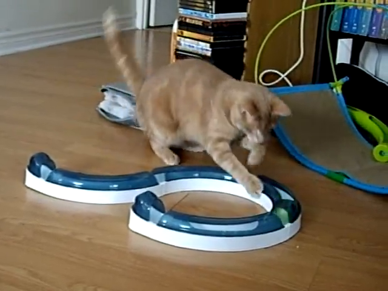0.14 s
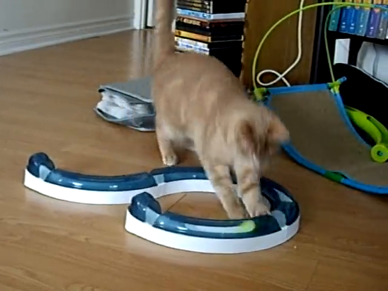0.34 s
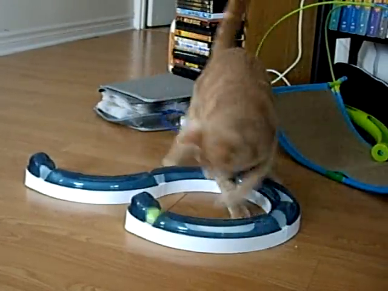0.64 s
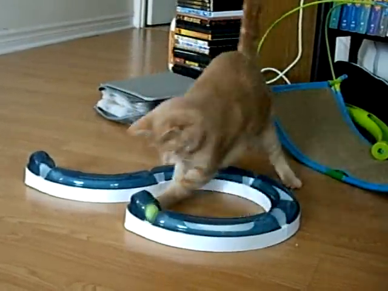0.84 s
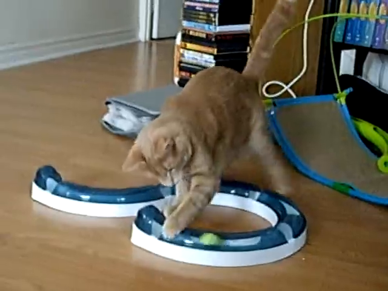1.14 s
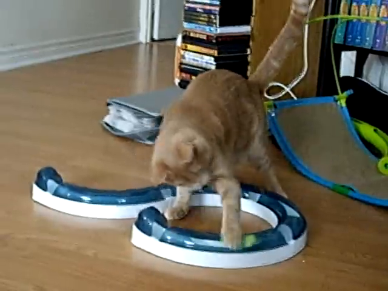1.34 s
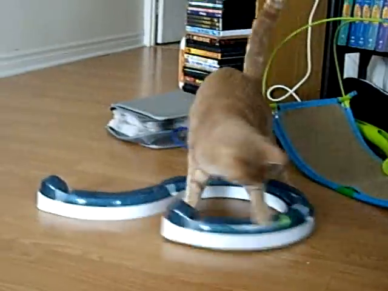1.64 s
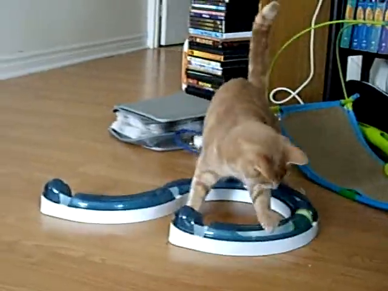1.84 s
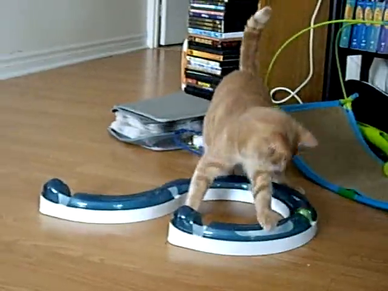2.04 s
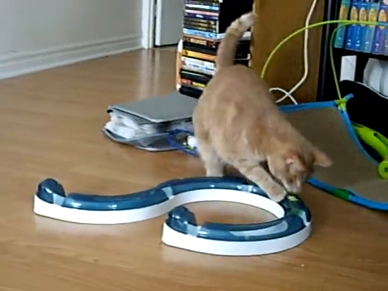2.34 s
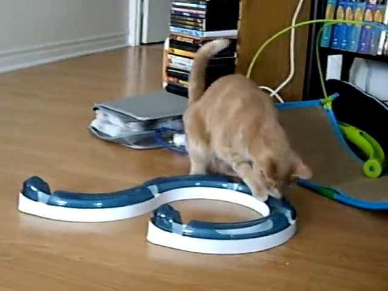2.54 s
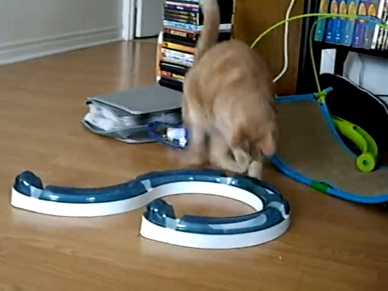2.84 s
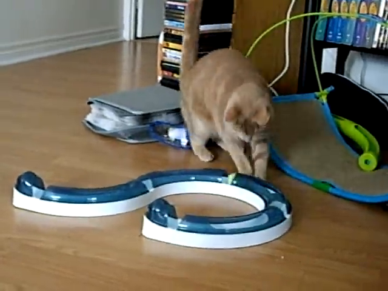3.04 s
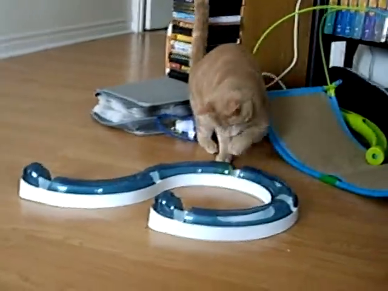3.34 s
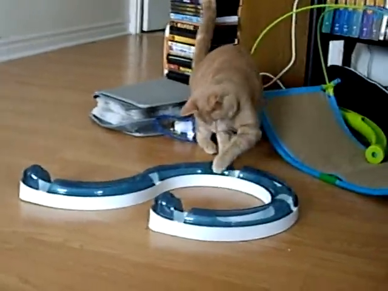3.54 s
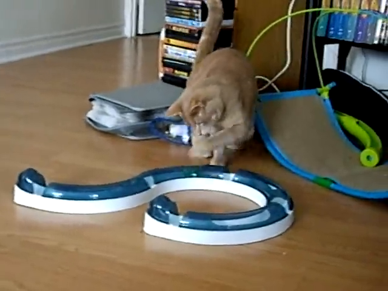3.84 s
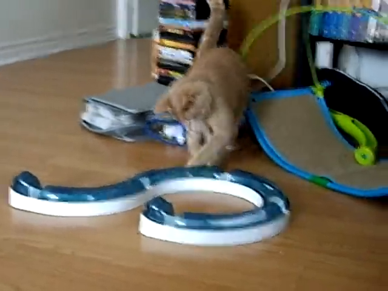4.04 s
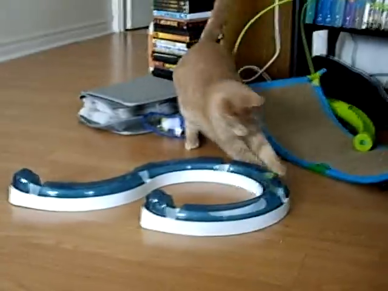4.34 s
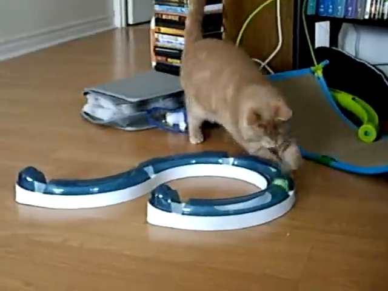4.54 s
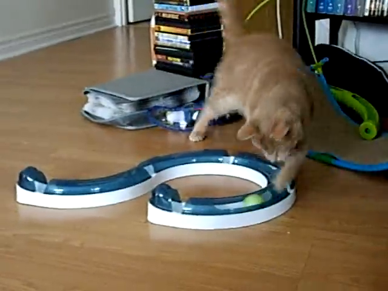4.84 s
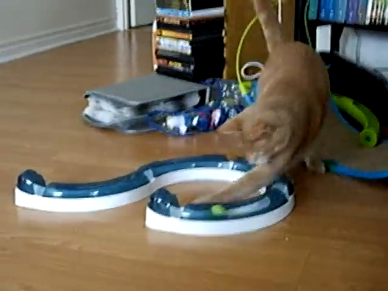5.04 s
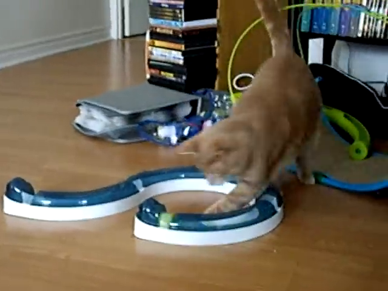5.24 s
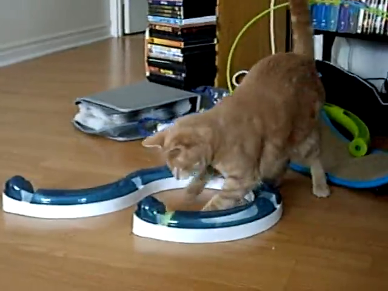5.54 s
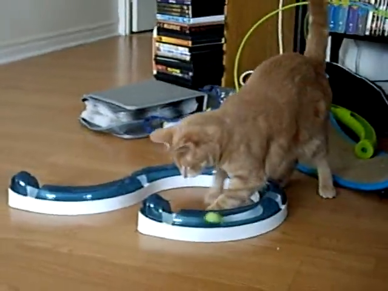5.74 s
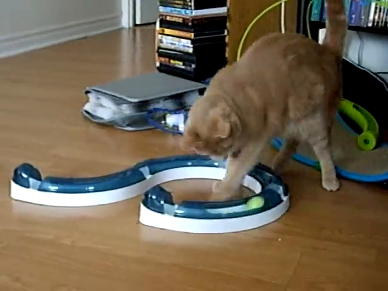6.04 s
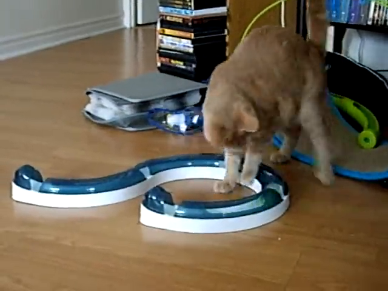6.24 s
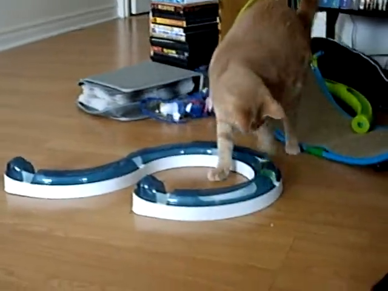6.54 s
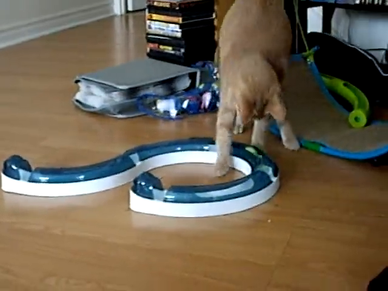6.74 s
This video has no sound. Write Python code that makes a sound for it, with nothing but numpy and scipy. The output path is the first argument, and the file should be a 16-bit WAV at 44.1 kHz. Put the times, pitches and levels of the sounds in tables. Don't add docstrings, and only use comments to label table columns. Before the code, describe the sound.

Irregular hollow plastic knocks and a rolling, clattering ball as a cat bats a toy indoors, above steady low hum and faint hiss.

```python
import sys
import numpy as np
from scipy import signal
from scipy.fft import rfft, irfft, next_fast_len
from scipy.io import wavfile
from scipy.ndimage import uniform_filter1d

SR = 44100
rng = np.random.default_rng(int(sys.argv[2]) if len(sys.argv) > 2 else 0)


def file_out(sig):
    cols = np.atleast_2d(sig).T
    lim = np.clip(cols, -1, 1)
    pcm = np.round(lim * 32767).astype(np.int16)
    wavfile.write(sys.argv[1], SR, pcm)


def makeup_ratio(level_db):
    decades = np.asarray(level_db, float) / 20
    return 10 ** decades


N = 304334

# (time [s], body peak [dB], body pitch [Hz], crack over body [dB], rattle fall by 60 dB [s])
BLOWS = [(1.3241, -15, 1480, -2.5, 0.028), (1.326, -22.5, 393, -26, 0.019), (1.461, -23, 1250, -45, 0.035),
         (1.466, -21.5, 1070, -28, 0.013), (1.4778, -10.5, 1076, 1, 0.03), (1.4779, -4.5, 7200, -6, .004),
         (1.479, -10.5, 1630, -11.5, 0.036), (2.023, -32, 376, -30, 0.014),
         (3.3252, -13, 1630, -12.5, 0.0021), (3.327, -10, 845, -36, 0.0063), (3.516, -18, 820, -8, 0.0048),
         (3.5291, -15, 1400, 5.5, 0.0089), (3.5301, -7, 820, -10, 0.014), (3.5289, -4, 6600, -9, .004),
         (3.867, -34, 398, -34, 0.013), (4.319, -30.5, 1210, 9, 0.012), (4.3245, -15, 1000, -0.5, 0.0097),
         (4.3255, -17.5, 566, -24, 0.071), (4.4475, -21.5, 870, -18, .015), (4.453, -29.5, 383, -23, 0.014),
         (4.083, -36, 480, -25, 0.027), (3.334, -22, 368, -30, 0.018), (3.324, -16, 640, -27, .006)]
# (time [s], body peak [dB], body pitch [Hz], crack over body [dB])
KNOCKS = [(0.053, -32.5, 700, -18), (0.134, -32.5, 1140, -20), (0.262, -33.5, 720, -24),
          (0.302, -37, 480, -23), (0.415, -30, 1400, -3), (0.444, -20, 710, -23), (0.467, -24, 584, -13),
          (0.494, -33, 1180, -13), (0.564, -37, 1120, -20), (0.784, -28.5, 1030, -11),
          (0.793, -26.5, 1090, -35), (0.865, -26.5, 1110, 0.5), (0.88, -22, 1600, -1), (0.9, -28, 895, -18),
          (1.175, -35, 1130, 0), (1.227, -33.5, 1300, -25), (1.683, -28.5, 970, -9),
          (1.73, -27.5, 1220, -25), (2.24, -32, 1075, -44), (4.055, -22, 1030, -11),
          (4.139, -29.5, 1030, 1), (4.256, -27, 1130, -8.5), (4.374, -27, 564, 5.5), (4.394, -25.5, 540, 4),
          (4.469, -26, 1000, 5.5), (4.48, -19.5, 700, -18), (5.164, -40, 1240, 1.5),
          (5.361, -36.5, 1000, -1), (5.653, -34.5, 1170, -20)]
# (time [s], body peak [dB], body pitch [Hz], crack over body [dB])
CLATTER = [
    (1.796, -46, 810, -18),
    (1.804, -13.5, 1500, -9.5),
    (1.81, -11.5, 1225, -12),
    (1.82, -19, 1170, -20),
    (1.832, -20, 1170, -3),
    (1.837, -16.5, 1510, -9),
    (1.855, -20, 1350, -17),
]
# (time [s], body peak [dB], body pitch [Hz], crack over body [dB])
TICKS = [(0.081, -34.5, 2700, 9.5), (0.398, -35, 1020, -26), (0.762, -29.5, 1420, -5.5),
         (1.004, -37, 1060, -16), (1.046, -42, 1070, -13), (1.195, -33, 1340, 4), (1.584, -35, 994, -9),
         (1.899, -29, 1140, -3), (2.022, -34.5, 830, 8.5), (2.404, -40, 830, 10.5),
         (3.111, -38.5, 3740, 17.5), (3.202, -46, 874, 17.5), (3.658, -24, 1170, -22),
         (3.867, -36, 3800, 16.5), (4.21, -43, 1100, 13), (4.4485, -22.5, 3480, 9), (5.251, -26.5, 3600, 0),
         (6.701, -36, 4170, 11), (2.09, -33, 6100, 7), (0.445, -27.5, 2580, -12), (4.3255, -23.5, 2200, -4),
         (1.3245, -21, 2500, -18), (6.702, -41, 875, -8), (2.013, -35, 890, -10)]
# (pitch [Hz], width [Hz], level [dB])
HOLLOW = [(265, 260, -9), (395, 92, -32), (520, 57, 0), (728, 41, -10.5), (837, 75, -9)]
# (pitch [Hz], width [Hz], level [dB])
SHELL = [(1000, 990, 0), (1170, 120, -3), (1385, 125, 5)]
# (pitch [Hz], width [Hz], level [dB])
RIM = [(1678, 350, 1.5), (2230, 345, -2.2), (2487, 200, -5), (3000, 630, 2.5), (3596, 1100, 2.8)]
# (pitch [Hz], width [Hz], level [dB])
CRACK = [(4230, 1100, 0.17), (4880, 1800, -1.9), (5610, 720, -0.6), (6570, 1300, -0.0048), (7130, 1700, 1),
         (8000, 9000, 1)]
# (time [s], rolling level [dB], sliding over rolling [dB])
ROLL = [(0.0, -46.5, -3.5), (0.33, -42, -14), (0.6, -46.5, -5), (0.95, -44.5, -1), (1.31, -46.5, -16),
        (1.5, -51, -21), (1.7, -37.5, -6.5), (1.9, -37.5, -5), (2.04, -48, 3.5), (2.3, -66.5, -12),
        (3.4, -56, -4), (3.75, -50, 1.5), (3.95, -54, -9), (4.15, -43, 2.5), (4.4, -42.5, -11),
        (4.7, -52.5, -18), (5.25, -52.5, 4.5), (5.7, -57.5, -8)]
# (start [s], fall by 60 dB [s], centre [Hz], width [octaves], level [dB])
BRUSHES = [(0.077, 0.45, 3000, 1.6, -37), (0.441, 0.39, 920, 3.4, -32), (0.784, 0.27, 1220, 3, -37.5),
           (.91, 0.3, 4150, 0.98, -34.5), (1.051, 0.76, 270, 1, -42), (1.731, 0.33, 1740, 1.4, -37),
           (1.804, 0.19, 1790, 1.7, -17), (1.804, 0.41, 4460, 0.61, -35.5), (2.862, 0.46, 1226, 0.48, -43),
           (3.075, 0.2, 5500, 1.7, -38.5), (3.052, 0.33, 2800, 0.27, -45), (3.508, .12, 4500, 4.6, -30.5),
           (3.531, 0.061, 810, 2.2, -20.5), (3.668, 0.33, 5000, 3.5, -39), (3.791, 0.78, 5650, 1.3, -43),
           (4.055, 0.12, 900, 2.9, -38), (4.134, 0.33, 3600, 1.3, -42), (4.257, 0.13, 1520, 2.9, -34),
           (4.391, 0.29, 520, .34, -39), (4.419, 0.025, 6000, 0.59, -39), (4.475, 0.31, 925, 1.3, -31.5),
           (5.255, 0.076, 1000, 1.1, -42), (4.469, 0.48, 5950, 0.71, -47), (2.301, 0.66, 396, 1.26, -50.5)]
# (pitch [Hz], width [Hz], level [dB])
HUM = [
    (117.9, 15.7, -51.5),
    (184.7, 23, -53),
    (361.3, 22, -62),
    (3890, 1080, -57),
]
# (middle [s], half length [s], level [dB])
DRONE = [(0.16, 0.052, -46), (0.448, 0.042, -50), (0.757, 0.27, -50.5), (1.12, 0.065, -51.5),
         (2.012, .15, -44), (2.537, 0.21, -48), (3.082, 0.05, -49), (4.824, 0.04, -48.5),
         (5.27, 0.34, -40.5), (5.588, 0.095, -43), (5.83, 0.088, -37), (6.302, 0.24, -44.5),
         (6.635, 0.1, -47), (6.9, 0.036, -44)]
# (pitch [Hz], level per Hz [dB])
ROOM_NOISE = [(20, 9), (40, -5.5), (80, 0), (150, -7), (200, -22), (260, -14.5), (450, -20.5), (700, -22),
              (1900, -27), (3600, -23), (5200, -26.5), (6500, -28.5), (7700, -34.5), (9000, -30)]
# (time [s], steps down [notches], extra wait before the last notch up [s])
NOTCHES = [
    (1.4783, 4, .0066),
    (1.8069, 1, .0511),
    (3.3272, 3, 0),
    (3.5299, 3, 0),
    (4.3260, 1, 0),
    (4.4487, 1, .0052),
]

BODY_SHARPNESS, BLOW_SHARPNESS = 5.8, 5.5
KNOCK_FALL_S, CLATTER_FALL_S, TICK_FALL_S = 0.041, 0.051, 0.036
BLOW_RIM_DB, KNOCK_RIM_DB, CLATTER_RIM_DB, TICK_RIM_DB = -4, -2.5, -0.5, 0.5
RIM_HZ, RIM_LOSS_DB = 1130, 9
RATTLE_SHARE = 0.13
ROLL_HOLLOW_DB, ROLL_SHELL_DB, ROLL_SCRATCH_DB = -8.5, -3, -1.5
HOLLOW_FOLLOWS, MEAN_ROLL_DB = 0.37, -46
BRUSH_RISE_S, SLOWEST_RISE_S = 0.0035, 0.02
FIRM_BRUSH_DB, SOFTER_SLOWER = -41, 2.24
ROOM_FALL_S, WALL_CUT_HZ = 0.15, 14000
DRONE_BED_DB, ROOM_DB = -58, -39.5
WHINE_HZ, WHINE_DB = 7380.5, -61
NOTCH_DB, HOLD_S, CLIMB_S = 1, 0.0329, 0.02935
BIAS_STEP, BIAS_SETTLE_S = 0.118, 0.11
SMEAR_DB, SMEAR_S, SMEAR_HZ = -11.5, 0.0054, 2500
CUTOFF_HZ, OVERLOAD = 8560, 0.72


def rms_one(x):
    return x / np.sqrt(np.mean(x ** 2) + 1e-20)


def peak_one(x):
    return x / np.max(np.abs(x))


def in_time(rows):
    s, *columns = np.transpose(rows)
    return [np.interp(np.arange(N) / SR, s, column) for column in columns]


def drift(rate_hz):
    r = np.exp(-80 * np.pi * rate_hz / SR)
    slow = signal.lfilter([1], [1, -2 * r, r * r], rng.standard_normal(N // 40 + 2002))[2000:]
    return np.interp(np.arange(N) / 40, np.arange(len(slow)), rms_one(slow))


def ring(x, hz, width_hz):
    r, turn = np.exp(-np.pi * width_hz / SR), 2 * np.pi * hz / SR
    return signal.lfilter([0, np.sin(turn)], [1, -2 * r * np.cos(turn), r * r], x + 1e-18)


def soft_ring(x, hz, width_hz):
    return ring(ring(x, hz, width_hz), hz, hz / 2.03) * 2 * np.pi * hz / SR


def contacts(shape, per_s, spread_db):
    sizes = makeup_ratio(spread_db * np.minimum(rng.exponential(1, shape), 5)) * rng.choice([-1, 1], shape)
    return sizes * (rng.random(shape) < per_s / SR)


def struck(blow, modes, gains):
    total = 0
    for (hz, width, db), gain in zip(modes, gains):
        total = total + gain * makeup_ratio(db) * peak_one(soft_ring(blow, hz, width))
    return peak_one(total)


def knocks():
    rows = [tuple(row) + (BLOW_SHARPNESS, BLOW_RIM_DB) for row in BLOWS]
    kinds = ((KNOCKS, KNOCK_FALL_S, KNOCK_RIM_DB), (CLATTER, CLATTER_FALL_S, CLATTER_RIM_DB),
             (TICKS, TICK_FALL_S, TICK_RIM_DB))
    for table, fall_s, rim_db in kinds:
        rows += [tuple(row) + (fall_s, BODY_SHARPNESS, rim_db) for row in table]
    length = round(0.15 * SR)
    out, t = np.zeros(N + length), np.arange(length) / SR
    rattles = contacts((len(rows), length), 5000, 2.8)
    neighbours = HOLLOW[1:] + SHELL
    rim_start = len(neighbours)
    crack_start = rim_start + len(RIM)
    for (s, body_db, hz, crack_db, fall_s, sharpness, rim_db), rattle in zip(rows, rattles):
        blow = RATTLE_SHARE * rattle * makeup_ratio(-60 * t / np.clip(fall_s, 0.003, 0.3))
        blow[0] = 1
        strong, sign = rng.standard_normal((2, 19))
        gains = makeup_ratio(1.5 * strong) * np.sign(sign)
        low = struck(blow, neighbours, gains)
        rim = struck(blow, RIM, gains[rim_start:])
        crack = struck(blow, CRACK, gains[crack_start:])
        spot = peak_one(soft_ring(blow, hz, hz / sharpness))
        body = peak_one(spot + makeup_ratio(-7.0) * low * min(1, 1500 / hz) ** 2)
        rim_level_db = rim_db - RIM_LOSS_DB * np.log2(hz / RIM_HZ) ** 2
        sound = body + makeup_ratio(rim_level_db) * rim + makeup_ratio(crack_db) * crack
        start = round(s * SR)
        out[start:start + length] += makeup_ratio(body_db) * sound
    return out[:N]


def rolling():
    clumps = makeup_ratio(2.4 * drift(22))
    roll_db, slide_db = in_time(ROLL)
    hollow_db = MEAN_ROLL_DB + HOLLOW_FOLLOWS * (roll_db - MEAN_ROLL_DB) + ROLL_HOLLOW_DB
    parts = ((HOLLOW, hollow_db), (SHELL + RIM[:3], roll_db + ROLL_SHELL_DB),
             (RIM[3:] + CRACK, roll_db + slide_db + ROLL_SCRATCH_DB))
    out = 0
    for modes, level_db in parts:
        touches = clumps * contacts(N, 2500, 3.26)
        shaken = sum(makeup_ratio(db) * soft_ring(touches, hz, 4.8 * width) for hz, width, db in modes)
        out = out + makeup_ratio(level_db) * rms_one(shaken)
    return out


def brushes():
    out, t = np.zeros(N + SR), np.arange(SR // 2) / SR
    for s, fall_s, centre_hz, octaves, level_db in BRUSHES:
        rise_s = min(BRUSH_RISE_S * makeup_ratio(SOFTER_SLOWER * (FIRM_BRUSH_DB - level_db)), SLOWEST_RISE_S)
        grains = contacts(len(t), 3500, 3.2) * makeup_ratio(2.2 * drift(60)[:len(t)])
        body = 0
        for hz, width, _ in HOLLOW + SHELL + RIM + CRACK:
            near = makeup_ratio(-24 * (np.log2(hz / centre_hz) / octaves) ** 2)
            body = body + near * np.sqrt(width) * soft_ring(grains, hz, 0.51 * width)
        stroke = np.minimum(t / rise_s, 1) ** 0.49 * makeup_ratio(-60 * np.maximum(t - rise_s, 0) / fall_s)
        start = round(s * SR)
        out[start:start + len(t)] += makeup_ratio(level_db) * stroke * rms_one(body)
    return out[:N]


def room(x):
    size = next_fast_len(N + SR)
    hz = np.arange(size // 2 + 1) * SR / size
    dull, response = 1 / (1 + 1j * hz / WALL_CUT_HZ), 0
    for k, lag_s in enumerate(rng.uniform(0.006, 0.035, 10)):
        loop = makeup_ratio(-60 * lag_s / ROOM_FALL_S) * dull * np.exp(-2j * np.pi * hz * lag_s)
        response = response + (-1) ** k * loop / (1 - loop)
    return irfft(rfft(x, size) * response, size)[:N]


def narrow(hz, width_hz):
    noise = rng.standard_normal(N + SR)
    return rms_one(ring(ring(noise, hz, width_hz), hz, width_hz)[SR:])


def hums():
    t = np.arange(N) / SR
    swell = makeup_ratio(DRONE_BED_DB) + sum(makeup_ratio(db) * np.exp(-((t - s) / half) ** 2) for s, half, db in DRONE)
    drone = np.sqrt(2) * np.sin(2 * np.pi * np.cumsum(76.5 + 3 * drift(4)) / SR)
    return sum(makeup_ratio(db) * narrow(hz, width) for hz, width, db in HUM) + swell * drone


def room_noise():
    edges = 18 * 2 ** np.arange(0, 9.1, 1 / 3)
    white = rng.standard_normal((2, N + SR))
    point_hz, point_db = np.transpose(ROOM_NOISE)
    out = 0
    for k, (low, high) in enumerate(zip(edges, edges[1:])):
        band_pass = signal.butter(2, [low, high], "band", fs=SR, output="sos")
        band = signal.sosfilt(band_pass, white[k % 2])[SR:]
        level_db = np.interp(np.log(low * high) / 2, np.log(point_hz), point_db)
        out = out + makeup_ratio(level_db + 1.1 * drift(26.0)) * band
    return rms_one(out)


def whine():
    tone = np.sqrt(2) * np.sin(2 * np.pi * WHINE_HZ * np.arange(N) / SR)
    return makeup_ratio(WHINE_DB + 2.0 * drift(50)) * tone


def gain_moves():
    moves = np.zeros(N)
    for s, notches, wait_s in NOTCHES:
        moves[round(s * SR)] = -notches
        ups = s + HOLD_S + CLIMB_S * np.arange(notches)
        ups[-1] += wait_s
        moves[np.round(ups * SR).astype(int)] = 1
    return moves


def smear(x):
    treble = signal.butter(2, SMEAR_HZ, "high", fs=SR, output="sos")
    power = uniform_filter1d(signal.sosfilt(treble, x) ** 2, round(SMEAR_S * SR))
    noise = rms_one(signal.sosfilt(treble, rng.standard_normal(N)))
    return makeup_ratio(SMEAR_DB) * np.sqrt(np.abs(power)) * noise


def scene():
    blows, strokes = knocks(), brushes()
    echoes = room(makeup_ratio(-21.5) * blows + makeup_ratio(-14.5) * strokes)
    return (blows + strokes + echoes + rolling() + hums())[None]


def roll_off(x):
    return signal.sosfilt(signal.butter(12, 16970, fs=SR, output="sos"), x)


def record(dry):
    moves = gain_moves()
    leak = np.exp(-1 / (BIAS_SETTLE_S * SR))
    thump = BIAS_STEP * signal.lfilter([1], [1, -leak], moves)
    setting = uniform_filter1d(np.cumsum(moves), size=88, origin=43)
    x = dry * makeup_ratio(NOTCH_DB * setting) + thump
    x = x + whine() + makeup_ratio(ROOM_DB - 5.0) * room_noise()
    x = x + smear(x)
    top_cut = signal.ellip(10, 0.25, 40, CUTOFF_HZ, fs=SR, output="sos")
    x = signal.sosfiltfilt(top_cut, x)
    x = x / (1 + (x / OVERLOAD) ** 8) ** (1 / 8)
    return roll_off(x)


dry = scene()
out = record(dry)
file_out(out)
```